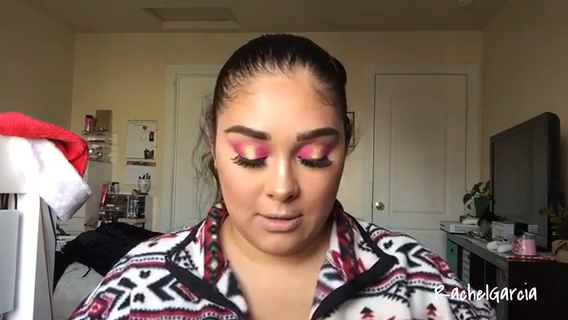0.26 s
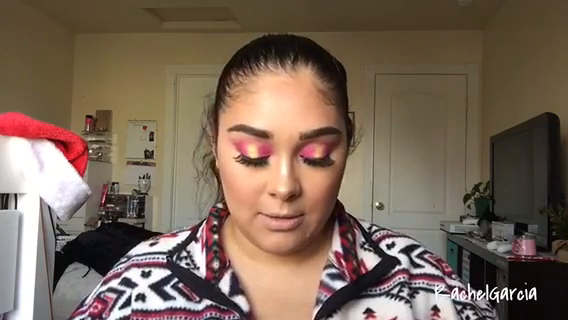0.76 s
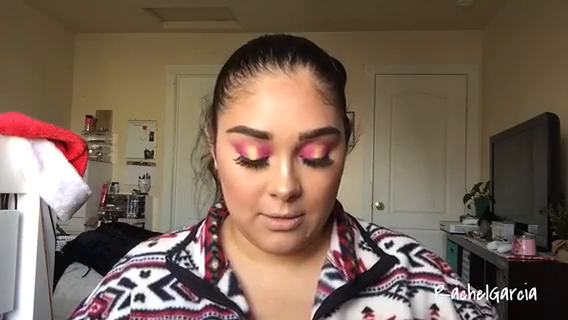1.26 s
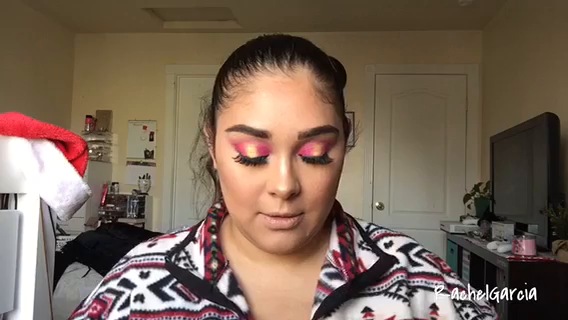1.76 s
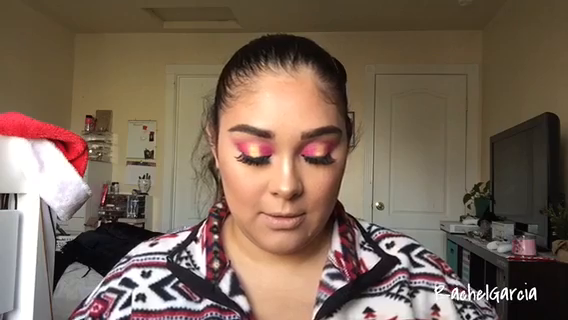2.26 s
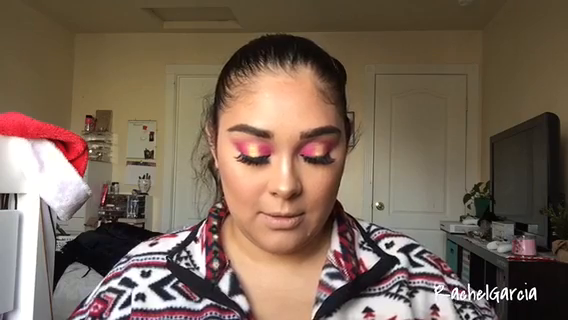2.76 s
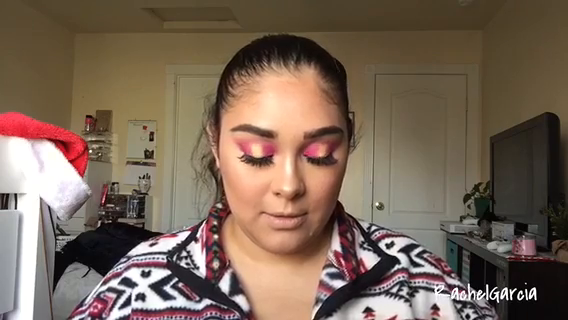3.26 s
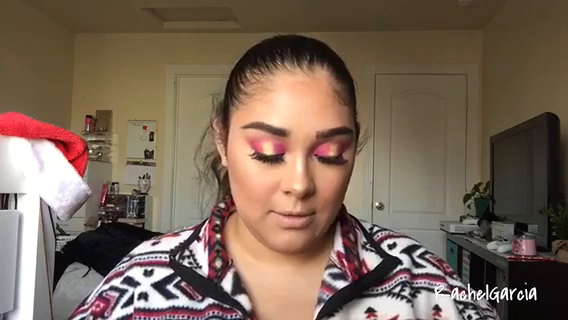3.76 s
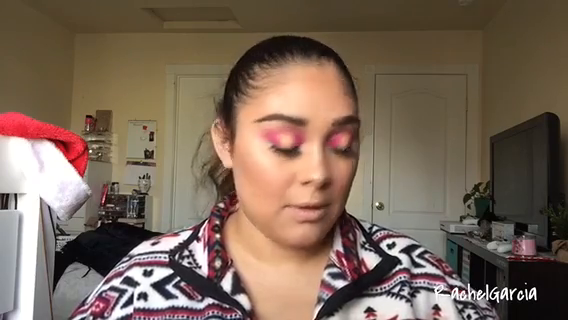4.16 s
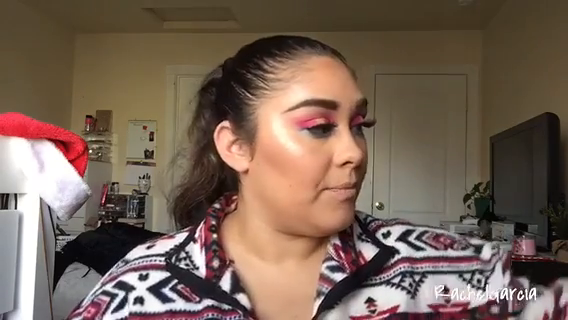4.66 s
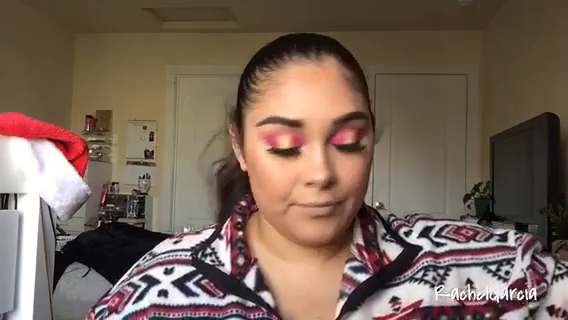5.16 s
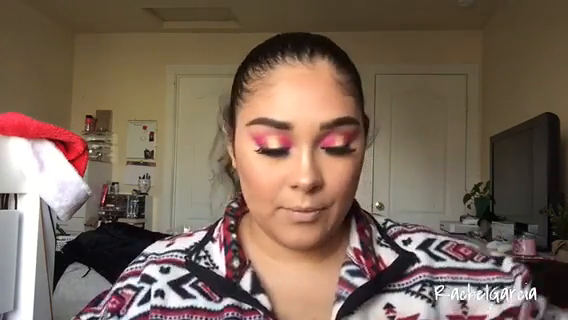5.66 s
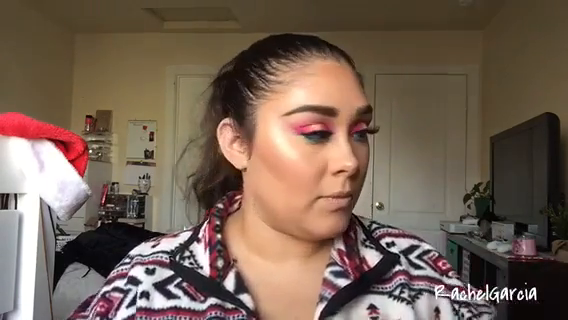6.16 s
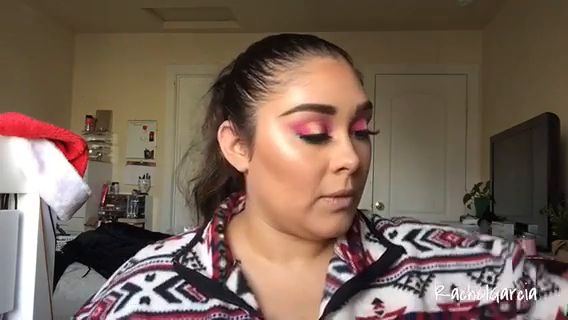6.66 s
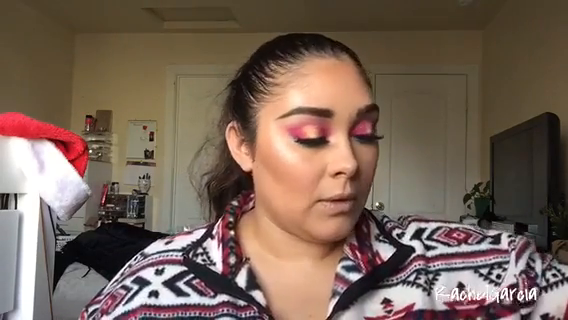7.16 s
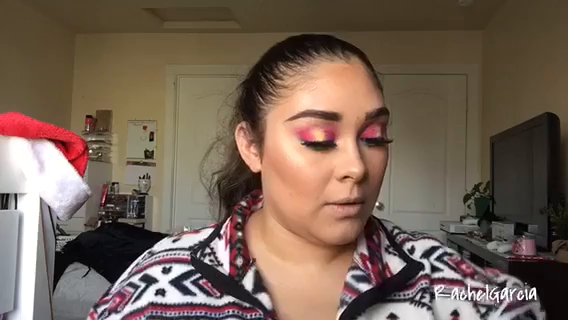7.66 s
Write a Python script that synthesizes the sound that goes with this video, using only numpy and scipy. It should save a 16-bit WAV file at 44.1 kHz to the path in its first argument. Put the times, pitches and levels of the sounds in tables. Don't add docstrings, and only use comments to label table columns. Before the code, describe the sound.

Dry plastic ticks and short rattles come in a dense flurry, easing into separate clicks with quieter gaps. Around five seconds, hollow bumps and gritty slides come from a tray, with a dull desk thud beneath. Faint cloth brushing leads to a final burst of tray knocks, ending in a hard double drop. Close microphone, short soft room echo, faint fan and air noise throughout.

```python
import sys
import numpy as np
from scipy import signal
from scipy.fft import rfft, irfft, next_fast_len
from scipy.io import wavfile

SR = 44100
rng = np.random.default_rng(int(sys.argv[2]) if len(sys.argv) > 2 else 0)


def dump_mix(stems):
    frames = np.atleast_2d(stems).T
    limited = np.clip(frames, -1, 1)
    pcm = np.round(limited * 32767).astype(np.int16)
    wavfile.write(sys.argv[1], SR, pcm)


def makeup_ratio(level_db):
    decades = np.asarray(level_db, float) / 20
    return 10 ** decades


N = 348961

# pitch_hz, width_hz, level_db
CASE_MODES = [(820, 20, 14), (1250, 16, -43), (1650, 210, 13.5), (2050, 500, 5.5), (3470, 497, 14),
              (3635, 454, 14), (5000, 1130, -12), (7200, 39, -41)]
# pitch_hz, width_hz, level_db
TRAY_MODES = [(407, 98, -2), (670, 131, 1.5), (1100, 79, 1), (1610, 137, -1.5), (2120, 240, -5.5),
              (3220, 200, -8.5), (4455, 14, -13)]
# frequency_hz, density_db (per Hz)
FRICTION_HISS = [(1760, 2), (3000, -1.5), (4830, 0), (5290, -7.5), (8050, -4), (11300, -2.5),
                 (16000, -11.5)]
TICK_HOLLOW_DB, TICK_CHATTER_S = -16, 0.0055
STROKE_SAMPLES = 6000


def rms_one(x):
    return x / np.sqrt(np.mean(x ** 2) + 1e-20)


def colour(x, spectrum):
    size = next_fast_len(len(x))
    hz = np.maximum(np.arange(size // 2 + 1) * SR / size, 1)
    points = np.array(spectrum)
    gain_db = np.interp(np.log(hz), np.log(points[:, 0]), points[:, 1])
    return irfft(rfft(x, size) * makeup_ratio(gain_db), size)[:len(x)]


def above(x, hz):
    return signal.sosfilt(signal.butter(2, hz, "high", fs=SR, output="sos"), x)


def resonate(x, hz, width):
    r = np.exp(-np.pi * width / SR)
    feedback = [1, -2 * r * np.cos(2 * np.pi * hz / SR), r * r]
    return signal.lfilter([(1 - r * r) / 2, 0, (r * r - 1) / 2], feedback, x)


def resonate_twice(x, hz, width):
    return resonate(resonate(x, hz, width), hz, width)


def shell(x, modes, widen, shades_db):
    total = 0
    for k, ((hz, width, db), shade_db) in enumerate(zip(modes, shades_db)):
        total = total + (-1) ** k * makeup_ratio(db + shade_db) * resonate(x, hz, widen * width)
    return total


def place(hits, rows):
    out = np.zeros(N)
    for hit, row in zip(hits, rows):
        first = int(np.round(row[0] * SR))
        last = min(first + len(hit), N)
        out[first:last] += hit[:last - first]
    return out


def hump(length_s, rise):
    u = np.arange(STROKE_SAMPLES) / SR / length_s
    return np.minimum(u / rise, 1) * np.exp(-u ** 6)


def taps(rows):
    hits, t = [], np.arange(2048) / SR
    for s, peak_db, hz, bright_db, hollow_db, chatter_s in rows:
        grit = rng.standard_normal(len(t))
        shades_db = 3 * rng.standard_normal(len(CASE_MODES))
        force = makeup_ratio(-17.5) * grit * np.abs(grit) * np.exp(-t / chatter_s)
        force[0] += 1
        main = rms_one(resonate(force, hz, 0.16 * hz))
        body = rms_one(above(shell(force, CASE_MODES, 4, shades_db), 900))
        hollow = rms_one(resonate(force, 620, 600))
        crack = rms_one(above(force * np.exp(-t / 0.0089), 1900))
        hit = main + makeup_ratio(-5) * body + makeup_ratio(hollow_db + 11) * hollow + makeup_ratio(bright_db) * crack
        hits.append(makeup_ratio(peak_db) * hit / np.abs(hit).max())
    return place(hits, rows)


def case_taps():
    # start_s, peak_db, pitch_hz, brightness_db, hollowness_db
    hollow_side = [(0.045, -18, 1350, -37, -5), (0.072, -37, 1530, -4, -12), (0.132, -18.5, 1190, -34, -11),
                   (0.152, -8, 1430, 3, -10), (0.23, -9.5, 1440, -25, -12.5), (.278, -28, 1620, -4, -16),
                   (0.304, -6, 1340, 13.5, 4.5), (0.431, -21, 1650, 15, 9), (.553, -11.5, 1650, 8, 1),
                   (.9, -12, 1770, 3.5, -11.5), (1.111, -38, 1800, -23, 19), (1.244, -30, 1590, -25, -3),
                   (1.336, -25, 1350, -32, -10), (1.394, -27, 1840, -34, -14), (1.61, -10.5, 1380, 3.5, -5),
                   (1.958, -18.5, 1610, -32, -20), (2.526, -28.5, 1520, -30, -33),
                   (2.7704, -21.5, 1630, -17, -11), (3.3494, -4.5, 2280, -5, -21),
                   (3.3506, -14, 463, -30, -14), (3.5418, -18.5, 1850, 2, -40),
                   (4.3734, -19.5, 1480, -27, 14), (4.541, -23, 1450, -21, -30)]
    # start_s, peak_db, pitch_hz, brightness_db
    rim = [(0.108, -6, 1480, 7.5), (0.1407, -20.5, 1230, -19), (0.184, -25.5, 895, -23),
           (.328, -19, 1230, -26), (.479, -17, 1340, -6), (0.609, -22, 1750, -4), (.665, -24.5, 1660, -30),
           (0.711, -14, 1800, 1), (0.735, -11, 1650, -9), (0.764, -10, 1920, -30), (0.98, -32, 1650, -12),
           (1.0786, -17.5, 1520, -6), (1.543, -24.5, 1300, -14), (1.672, -5, 1710, 6.5),
           (1.9111, -14.5, 2050, -18), (1.9291, -19, 1560, -19), (2.088, -26.5, 1000, 31),
           (2.312, -16, 1390, -30), (2.328, -16.5, 1230, -27), (2.365, -26.5, 1460, -30),
           (2.704, -23, 1580, -21), (2.74, -23.5, 2100, -4), (2.757, -9.5, 1610, -2),
           (3.231, -23.5, 2160, -4), (4.381, -24, 1520, -9), (4.422, -22, 1810, -2), (4.548, -7, 1480, 4),
           (5.8537, -19.5, 1800, -23), (6.563, -20, 4200, 7)]
    # start_s, peak_db, pitch_hz, brightness_db
    touches = [(.842, -30, 1730, -17), (1.224, -40, 1890, -27), (1.511, -33, 1960, -23),
               (1.522, -39, 1340, -17), (1.594, -29, 1500, 0), (1.73, -25.5, 870, 2),
               (1.7444, -40, 1580, -14.5), (1.764, -29.5, 1610, -30), (1.797, -22.5, 1420, 5.5),
               (1.977, -32, 1860, -16), (2.461, -23, 2180, 6), (2.474, -29.5, 1880, -20),
               (2.586, -30.5, 1580, 0), (2.635, -25.5, 1500, -3.5), (2.805, -32.5, 1540, -30),
               (2.852, -34, 1420, -11), (2.8626, -31.5, 1670, -2), (2.904, -33, 1100, -31),
               (3.188, -30, 1470, -11), (3.259, -30, 1530, -7), (3.5167, -32.5, 2100, -35),
               (3.684, -30, 1580, -2), (3.881, -32.5, 1950, -28), (4.509, -34, 1580, 0),
               (4.595, -40, 1380, -19), (4.695, -33, 2670, -25), (4.766, -31.5, 1500, -22),
               (4.274, -41.5, 2000, -8), (6.3407, -31.5, 1570, 4), (6.863, -25.5, 1720, -6)]
    rows = [(*row, 0.0052) for row in hollow_side]
    rows += [(*row, -21, 0.0047) for row in rim]   # hollowness_db, chatter_s
    rows += [(*row, TICK_HOLLOW_DB, TICK_CHATTER_S) for row in touches]
    return taps(rows)


def nail_grazes():
    # start_s, peak_db
    grazes = [(0.211, -45), (0.41, -32), (0.529, -41), (1.007, -41), (1.501, -42), (1.889, -33.5),
              (2.382, -27), (2.432, -35), (2.486, -36), (2.615, -34), (2.666, -40), (3.117, -37),
              (4.737, -39), (6.383, -37), (6.947, -32.5)]
    pitch_hz, bright_db = 1800, -4.5
    return taps([(*row, pitch_hz, bright_db, TICK_HOLLOW_DB, TICK_CHATTER_S) for row in grazes])


def hard_edge_snaps():
    # start_s, peak_db, pitch_hz, ring_s, brightness_db
    edges = [(3.3492, -12, 1200, 0.0017, -11), (3.35, -11.5, 2350, 0.0019, -17),
             (3.5428, -20.5, 1615, 0.0049, -30), (3.3595, -23, 1540, 0.0023, -30),
             (4.3685, -29, 2700, 0.0017, -20), (4.372, -15, 1560, 0.0019, -25),
             (4.3725, -20.5, 6000, 0.00053, -3), (4.38, -16, 2160, 0.0014, 8),
             (5.314, -36, 2920, .002, -15), (5.362, -24, 2820, 0.0022, -10),
             (5.404, -25, 3130, 0.0017, -12), (5.339, -20, 10000, .001, -6), (5.382, -29, 9000, .001, -6),
             (5.8541, -20, 4770, 0.0022, -5), (5.953, -36, 1280, 0.0033, -20),
             (4.4155, -32, 12000, 0.0003, 0), (5.97, -34, 4900, .0015, -8), (5.979, -30, 4750, 0.0013, -10),
             (6.028, -32, 8000, .0005, 0), (6.037, -39, 2000, .002, -2), (6.061, -24, 5000, 0.00021, 21),
             (1.085, -45, 1500, 0.0022, -20), (1.159, -42, 1700, 0.0018, -3),
             (1.199, -42, 2030, 0.0016, -8), (1.406, -36, 1960, 0.0015, -10),
             (1.43, -41, 2200, 0.0012, -10), (3.543, -29.5, 293, 0.0066, -30),
             (7.0945, -23, 1100, 0.0014, -12),
             (0.0444, -22, 3500, 0.0013, -15), (0.074, -28, 1510, .002, -10),
                    (0.086, -26, 4440, 0.0011, -9), (.096, -25, 5730, .001, -8),
                    (0.107, -21.5, 4600, 0.0011, -6), (.195, -32, 7500, .0007, -4),
                    (.206, -28, 1300, 0.002, -16), (.215, -42, 3500, .001, 0),
                    (0.2267, -34, 2010, 0.0015, -11), (0.2314, -1.5, 4080, 0.0016, 12.5),
                    (0.2313, -8.5, 6700, 0.0011, 4), (.259, -35, 7200, .0006, -3),
                    (.278, -26, 5530, 0.0012, -8), (0.305, -18.5, 1410, 0.002, -12),
                    (0.433, -18, 6500, 0.00047, 1), (.53, -29, 7200, .001, -9), (.554, -16, 8120, .001, -4),
                    (.6, -28, 1860, .002, -12), (.652, -40, 2800, .001, -6), (0.7656, 0, 2500, 0.00036, -2),
                    (0.768, -14, 4670, 0.0008, -15), (0.902, -27.5, 3960, 0.0032, -10),
                    (0.984, -29.5, 1740, 0.0022, -15), (1.065, -38, 1530, 0.0022, -12),
                    (1.09, -30, 1670, 0.0017, -20), (1.674, -12, 5830, 0.00086, 0),
                    (1.96, -29.5, 5700, 0.0014, -6), (2.333, -24.5, 3930, 0.0011, -6),
                    (4.553, -19, 4400, 0.00066, -6), (4.594, -37, 4000, .0015, -10),
                    (4.614, -38, 9000, .0004, 0), (4.738, -38, 7000, 0.00028, 2)]
    rows = edges
    hits, click = [], np.eye(1, 1024)[0]
    for s, peak_db, hz, ring_s, bright_db in rows:
        tone = resonate(click, hz, 1 / (np.pi * ring_s))
        hit = tone / np.abs(tone).max() + makeup_ratio(bright_db) * above(click, 2500)
        hits.append(makeup_ratio(peak_db) * hit / np.abs(hit).max())
    return place(hits, rows)


def strokes(rows, rise_db_per_s, fall_db_per_s):
    t = np.arange(0, N, 64) / SR
    start, hold, db, hiss_db = np.transpose(rows)[:, :, None]
    early, late = np.maximum(start - t, 0), np.maximum(t - start - hold, 0)
    level = db - rise_db_per_s * early - fall_db_per_s * late
    return [np.interp(np.arange(N) / SR, t, v.max(axis=0)) for v in (level, level + hiss_db)]


def drift(rate):
    r = np.exp(-2 * np.pi * rate / SR)
    return rms_one(signal.lfilter([1], [1, -2 * r, r * r], rng.standard_normal(N + SR))[SR:])


def rubbing(shell_db, hiss_db, modes, per_s, uneven_db, flutter_db):
    sizes = makeup_ratio(uneven_db * np.minimum(rng.exponential(1, N), 5)) * rng.choice([-1, 1], N)
    caught = rng.random(N) < per_s / SR
    grains = sizes * caught * makeup_ratio(flutter_db * drift(45)) + 1e-18
    body = rms_one(shell(grains, modes, 4, np.zeros(len(modes))))
    return makeup_ratio(shell_db) * body + makeup_ratio(hiss_db) * rms_one(colour(grains, FRICTION_HISS))


def finger_rubbing():
    # start_s, hold_s, shell_db, hiss_over_shell_db
    rubs = [(.09, 0.019, -47, 11), (.26, 0.02, -50.5, 8), (.53, 0.075, -52.5, 10.5),
            (.75, 0.0095, -54.5, 8), (.92, 0.057, -53.5, 6.5), (1.16, 0.016, -56, 5.5),
            (1.45, 0.33, -56, -9), (2.36, 0.086, -63, 3), (2.72, .03, -64, 1), (3.1, 0.14, -68, 6),
            (4.56, 0.0049, -42, 2.5)]
    levels = strokes(rubs, rise_db_per_s=318, fall_db_per_s=200)
    fine = rubbing(*levels, CASE_MODES, per_s=3500, uneven_db=3.5, flutter_db=5)
    crackle = rubbing(*levels, CASE_MODES, per_s=250, uneven_db=2.0, flutter_db=7.0)
    return fine + makeup_ratio(-30) * crackle


def scrapes(rows, squeal_hz, squeal_width, damping, broad_db, hiss_db, rise):
    hits = []
    for s, db, hz, bright_db, length_s in rows:
        grit = rng.standard_normal(STROKE_SAMPLES)
        grit = grit * np.abs(grit)
        tone = rms_one(resonate(grit, hz, damping * hz))
        low = tone + makeup_ratio(broad_db) * rms_one(resonate(grit, 1330, 450))
        squeal = rms_one(resonate_twice(grit, squeal_hz, squeal_width))
        high = squeal + makeup_ratio(hiss_db) * rms_one(colour(grit, FRICTION_HISS))
        hits.append(makeup_ratio(db) * hump(length_s, rise) * (rms_one(low) + makeup_ratio(bright_db) * high))
    return place(hits, rows)


def hand_scrapes():
    # start_s, rms_db, pitch_hz, brightness_db, length_s
    rows = [(.076, -46, 1470, -2.5, 0.04), (.141, -44, 1300, -21, 0.018), (.186, -45, 1100, -6, 0.015),
            (.275, -47.5, 1500, 1, 0.029), (.333, -60, 1230, 1.5, 0.082), (.428, -33.5, 1566, -12, 0.029),
            (.547, -53, 1270, -1, 0.08), (.604, -27, 1940, -21.5, 0.018), (.908, -49, 1650, -13, 0.1),
            (1.108, -37.5, 1885, -33, 0.031), (2.737, -50, 1850, -9, 0.034), (3.269, -45, 1970, -18, 0.03)]
    return scrapes(rows, 6260, 11000, damping=0.022, broad_db=-2.0, hiss_db=11, rise=0.01)


def rasps(rows):
    hits = []
    for s, db, hz, width, length_s in rows:
        lumpy = rng.standard_normal(STROKE_SAMPLES) ** 3
        hits.append(makeup_ratio(db) * hump(length_s, 0.045) * rms_one(resonate_twice(lumpy, hz, width)))
    return place(hits, rows)


def hand_rasps():
    # start_s, rms_db, pitch_hz, width_hz, length_s
    rows = [(.183, -36, 1300, 700, 0.0093), (.288, -34.5, 6100, 1500, 0.021), (.433, -41, 3580, 900, 0.018),
            (.592, -46, 2400, 1510, 0.014), (.608, -27.5, 2050, 350, 0.0073), (.68, -46, 3050, 900, 0.018),
            (.77, -37, 1980, 900, 0.014), (.91, -46, 2100, 900, 0.042), (.95, -43, 1800, 600, 0.038),
            (1.005, -40.5, 1690, 500, 0.011), (1.108, -37, 504, 300, 0.022),
            (1.675, -32, 2250, 1200, 0.0074), (2.316, -41, 1560, 400, 0.014),
            (2.333, -35, 1540, 500, 0.013), (2.455, -48.5, 3980, 4000, 0.013),
            (2.733, -42, 1900, 800, 0.012), (2.759, -35, 1800, 700, .012), (4.535, -41, 1500, 700, 0.0082),
            (4.535, -40, 4160, 1500, 0.014), (4.552, -36, 1890, 700, 0.013),
            (4.688, -53, 2840, 2000, 0.017)]
    return rasps(rows)


def tray_knocks():
    # start_s, peak_db, pitch_hz, brightness_db, length_s
    bumps = [(0.144, -22.5, 168, -34, 0.0022), (5.161, -23.5, 717, -36, 0.023),
             (5.1855, -14.5, 670, -45, 0.0066), (5.201, -18, 1130, -31, 0.03),
             (5.289, -22, 670, -35, 0.012), (5.362, -16, 662, -29, 0.038), (5.413, -24, 880, -16, 0.0094),
             (5.487, -23, 1140, -5, 0.0084), (5.8525, -22.5, 512, -56, 0.0087),
             (5.909, -27, 474, -49, 0.018), (5.973, -29, 450, -39, 0.012), (7.186, -15, 1390, -22, 0.004),
             (7.19, -7, 670, -38, 0.011)]
    # start_s, peak_db, pitch_hz, brightness_db, length_s
    slams = [
        (7.3143, -1, 1150, -30, .0045),
        (7.321, 5, 1140, -36, .0058),
    ]
    # start_s, peak_db, pitch_hz, brightness_db, length_s
    shoves = [(5.092, -27.5, 980, -29, 0.0068), (5.31, -26, 954, -47, 0.025),
              (5.323, -17.5, 670, -29, 0.03), (5.377, -21, 1020, -22, 0.018),
              (5.454, -19.5, 1100, -31, 0.023), (5.858, -25, 519, -51, 0.042),
              (5.997, -42, 1340, -23, 0.0063), (7.093, -22, 746, -53, 0.015), (7.094, -19, 446, -53, 0.014),
              (7.244, -9, 684, -52, 0.0096), (7.264, -10, 700, -41, 0.0092), (7.273, -13, 690, -38, 0.012),
              (7.305, -18, 590, -49, 0.0071)]
    rows = []
    for contacts, rise in ((bumps, 0.14), (slams, 0.4), (shoves, 0.24)):
        rows += [(*row, rise) for row in contacts]
    hits, t = [], np.arange(STROKE_SAMPLES) / SR
    for s, peak_db, hz, bright_db, length_s, rise in rows:
        grit, pressure = rng.standard_normal(STROKE_SAMPLES), hump(length_s, rise)
        rough = makeup_ratio(-11.5) * grit * np.abs(grit) * pressure
        rough[0] += makeup_ratio(-15) / rise
        wander = min(6 * length_s, .11) * np.cumsum(grit)
        slips = np.sin(2 * np.pi * hz * t + wander) * pressure
        main = rms_one(resonate(slips + .5 * rough, hz, hz))
        body = rms_one(shell(rough, TRAY_MODES, 4, np.zeros(len(TRAY_MODES))))
        hit = main + makeup_ratio(-9) * body + makeup_ratio(bright_db + 25.5) * rms_one(above(rough, 4900))
        hits.append(makeup_ratio(peak_db) * hit / np.abs(hit).max())
    return place(hits, rows)


def loose_lid(struck):
    # pitch_hz, width_hz, level_db
    lid_modes = [(1085, 7, -6), (1185, 6, -6), (1281, 8, -3), (3350, 30, -12)]
    return makeup_ratio(-7.5) * shell(struck, lid_modes, 0.66, np.zeros(len(lid_modes)))


def tray_slides():
    # start_s, hold_s, shell_db, hiss_over_shell_db
    slides = [
        (5.09, 0.17, -49.5, 3.5),
        (5.188, 0.017, -28, -13),
        (5.316, 0.095, -30, -7),
        (5.415, 0.1, -29.5, -14),
        (5.86, 0.18, -46.5, -13),
        (7.13, 0.18, -38.5, -2),
        (7.28, 0.099, -42.5, 4.5),
    ]
    levels = strokes(slides, rise_db_per_s=2000, fall_db_per_s=443)
    return rubbing(*levels, TRAY_MODES, per_s=3000, uneven_db=3.2, flutter_db=4.2)


def tray_scrapes():
    # start_s, rms_db, pitch_hz, brightness_db, length_s
    rows = [(5.095, -37.5, 1100, -43, 0.029), (5.322, -25, 1370, -22, 0.03), (5.416, -32, 2280, -28, 0.027),
            (5.479, -34.5, 1960, -21, 0.027), (5.856, -44.5, 1510, 4, 0.04), (5.91, -46.5, 1170, -1, 0.018),
            (5.967, -47, 1300, -15, 0.055), (5.986, -33, 1310, -1.5, 0.021), (6.01, -35, 1360, -24, 0.024),
            (4.245, -70, 2010, 1, 0.012), (7.131, -33.5, 886, -22, 0.011), (7.159, -32, 630, -13, 0.062),
            (7.329, -36.5, 2070, -20, 0.026)]
    return scrapes(rows, 4900, 1400, damping=0.44, broad_db=-22.0, hiss_db=-0.5, rise=0.13)


def tray_rasps():
    # start_s, rms_db, pitch_hz, width_hz, length_s
    rows = [(5.313, -29, 2830, 490, 0.013), (5.326, -36, 4260, 500, 0.015), (5.413, -36, 5000, 1500, 0.012),
            (5.421, -28.5, 2540, 700, 0.0092), (5.457, -24, 2190, 450, 0.016),
            (5.483, -37, 4440, 248, 0.022), (5.858, -39.5, 930, 149, 0.049), (5.86, -37, 1800, 600, 0.032),
            (4.369, -38.5, 10500, 4000, 0.02), (5.982, -34, 3440, 900, 0.028),
            (5.986, -40.5, 8300, 1500, 0.028), (4.422, -44, 9900, 5000, 0.016),
            (7.14, -45, 4400, 400, 0.0064), (7.153, -38, 4300, 500, 0.026), (7.187, -30, 1410, 500, 0.019),
            (7.188, -28, 3220, 500, 0.011), (7.242, -43, 3300, 800, 0.024), (7.261, -25.5, 434, 200, 0.028),
            (7.27, -25, 1100, 400, 0.019), (7.264, -31.5, 2070, 600, 0.032), (7.292, -29, 484, 250, 0.015),
            (7.312, -18, 2050, 500, 0.006), (7.314, -26, 3360, 500, 0.0092),
            (5.165, -31.5, 2550, 1200, 0.009), (5.2, -33.5, 2800, 700, 0.012),
            (5.216, -30, 2570, 500, 0.0078)]
    return rasps(rows)


def desk_top(tray):
    pressure = np.minimum(np.abs(tray), 0.063)
    return makeup_ratio(0.5) * resonate(pressure, 150, 90)


def sleeve_brush():
    # start_s, hold_s, dull_db, hiss_over_dull_db
    passes = [
        (4.68, 0.15, -60, 1.5),
        (6.15, 0.4, -60, -4),
        (6.7, 0.3, -55.5, -5),
        (7.05, 0.05, -46.5, -0.5),
        (7.55, 0.51, -58.5, -4),
    ]
    levels = strokes(passes, rise_db_per_s=114, fall_db_per_s=96)
    return rubbing(*levels, TRAY_MODES, per_s=20000, uneven_db=2, flutter_db=1.5)


def bedroom(x):
    t60_s, first_echo_s, wall_cut_hz = .22, .004, 16000
    t = np.arange(SR // 2) / SR
    echoes = rng.standard_normal(len(t)) * makeup_ratio(-60 * t / t60_s) * (t > first_echo_s)
    echoes = signal.sosfilt(signal.butter(1, wall_cut_hz, fs=SR, output="sos"), echoes)
    return makeup_ratio(-5.5) * signal.fftconvolve(x, echoes / np.sqrt(np.sum(echoes ** 2)))[:N]


def air():
    # frequency_hz, density_db (per Hz)
    ventilation = [(2.4, 7.5), (4.0, 1), (19, -2), (37, -11.5), (65, -8), (89, -20.5), (330, -31.5),
                   (647, -35), (1020, -34.5), (1250, -35), (1390, -38.5), (1600, -36.5), (2040, -38.5),
                   (4500, -55), (14900, -67.5)]
    # pitch_hz, width_hz, rms_db
    fan_hums = [(34.6, 19, -48), (53, 21.4, -48.5), (143.7, 24, -58.5), (450, 71, -61.5), (1023, 51, -66.5),
                (1340, 77, -64.5)]
    total = makeup_ratio(-35) * rms_one(colour(rng.standard_normal(N), ventilation))
    white = rng.standard_normal(N)
    for hz, width, db in fan_hums:
        total = total + makeup_ratio(db) * rms_one(resonate_twice(white, hz, width))
    return total


def arm_lean():
    at_s, length_s, push_hz = 14, 0.14, 42
    t = np.arange(N) / SR - at_s
    return makeup_ratio(-48) * np.exp(-(t / length_s) ** 2) * rms_one(resonate(rng.standard_normal(N), push_hz, 15))


def scene():
    hands = case_taps() + nail_grazes() + hard_edge_snaps()
    hands = hands + finger_rubbing() + hand_scrapes() + hand_rasps() + sleeve_brush()
    struck = tray_knocks()
    tray = struck + loose_lid(struck) + tray_slides()
    desk = desk_top(tray)
    tray = tray + tray_scrapes() + tray_rasps()
    muffled = 0.34 * np.tanh(tray / 0.34)
    echoes = bedroom(makeup_ratio(-11.5) * hands + makeup_ratio(-5.5) * muffled + desk)
    things = hands + tray + desk + echoes
    mic = signal.butter(2, 7450, fs=SR, output="sos")
    return (signal.sosfilt(mic, things) + air() + arm_lean())[None]


def low_pass(x):
    return signal.sosfilt(signal.butter(12, 16790, fs=SR, output="sos"), x)


def record(dry):
    rounded = dry / (1 + (np.abs(dry) / .98) ** 6) ** (1 / 6)
    top_cut = signal.ellip(6, .5, 22, 15650, fs=SR, output="sos")
    return low_pass(signal.sosfilt(top_cut, rounded))


dry = scene()
out = record(dry)
dump_mix(out)
```